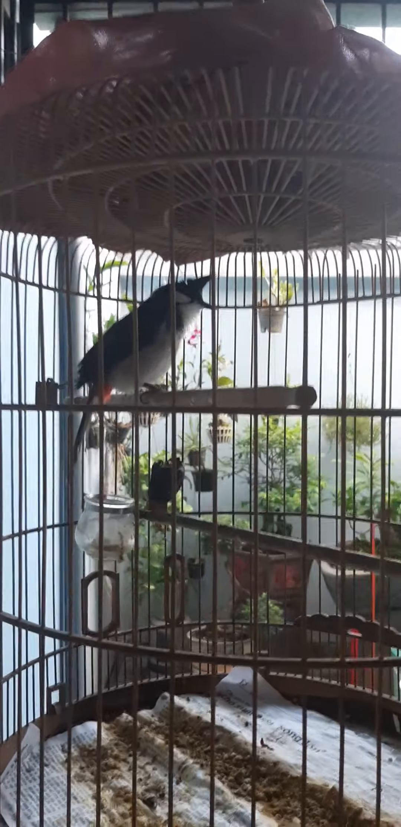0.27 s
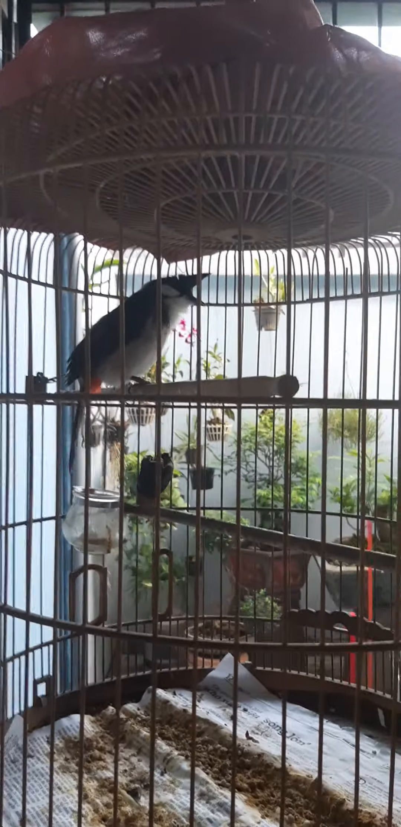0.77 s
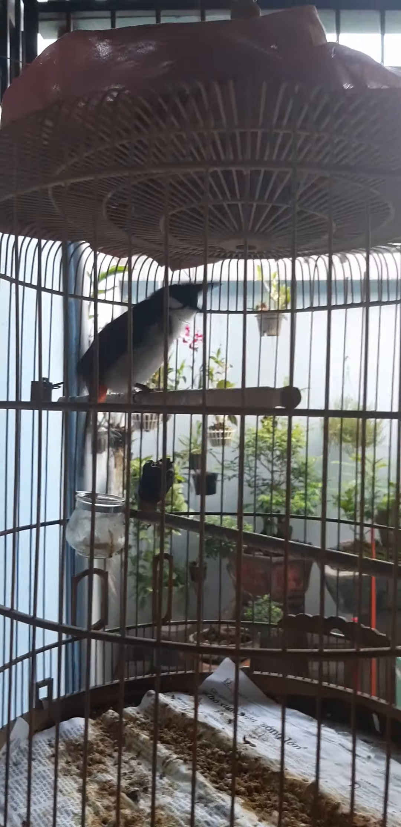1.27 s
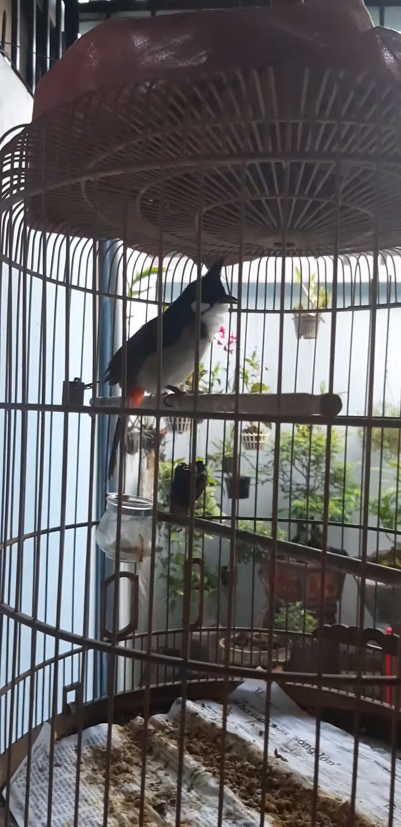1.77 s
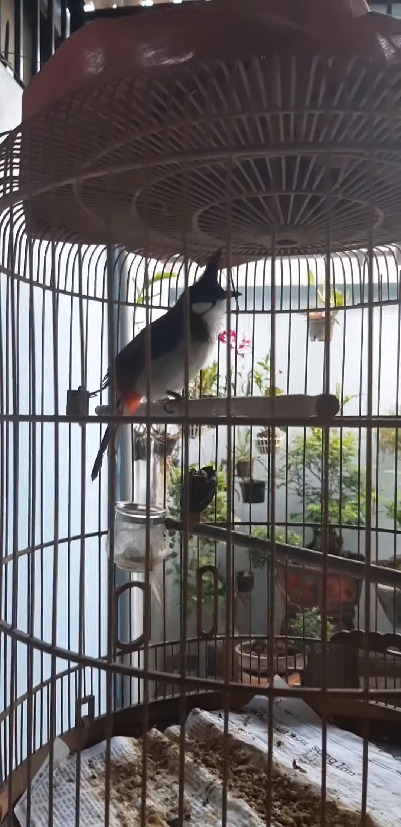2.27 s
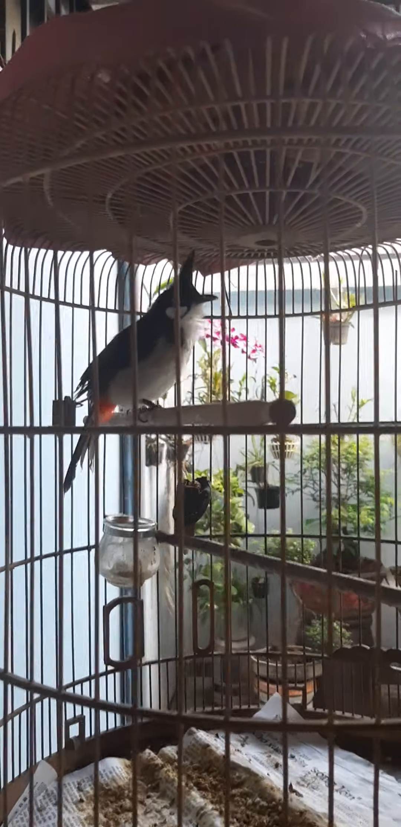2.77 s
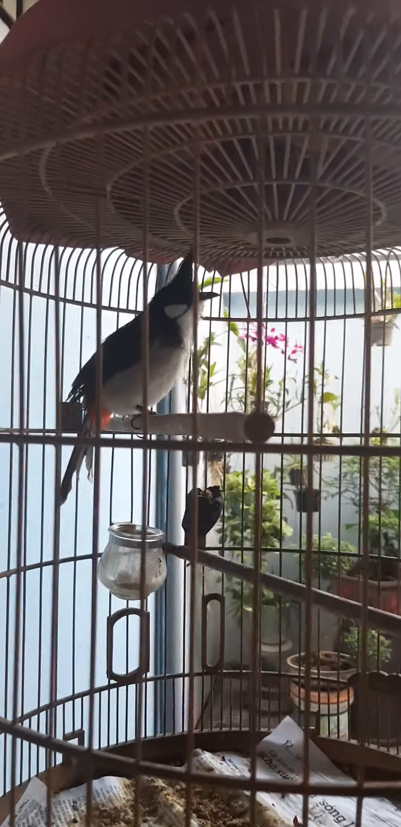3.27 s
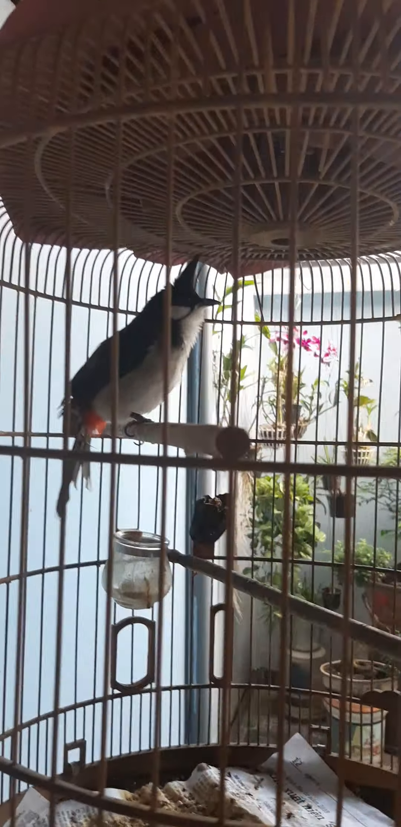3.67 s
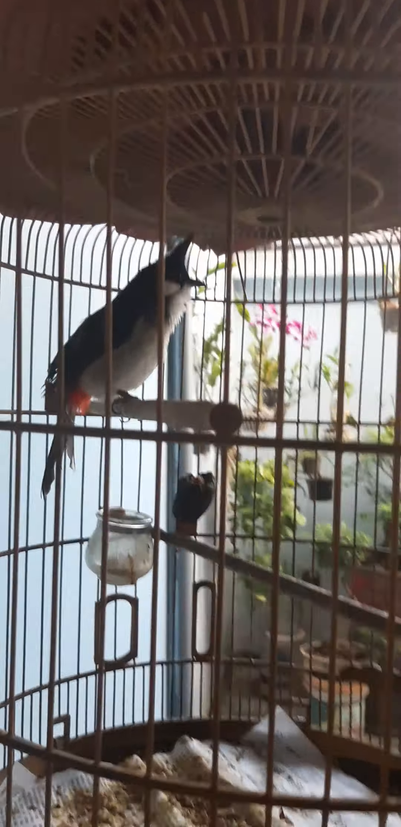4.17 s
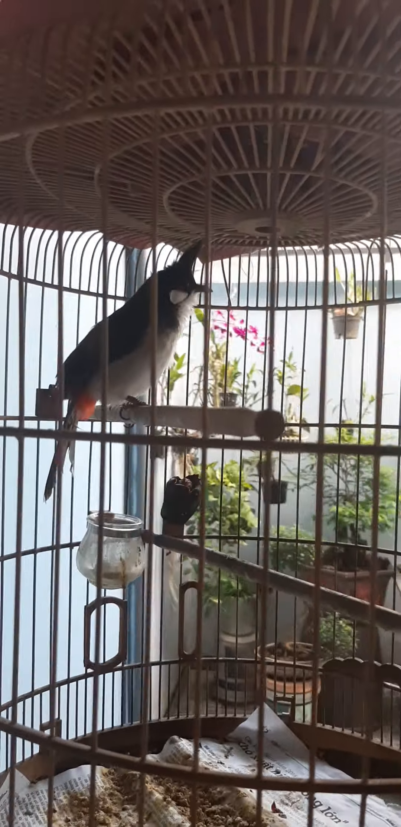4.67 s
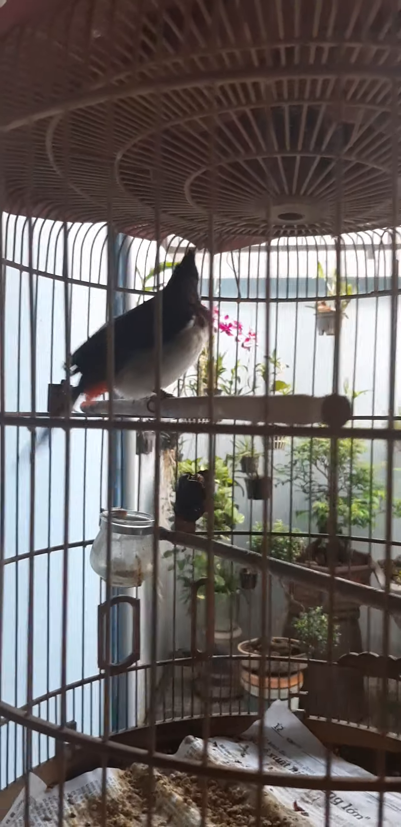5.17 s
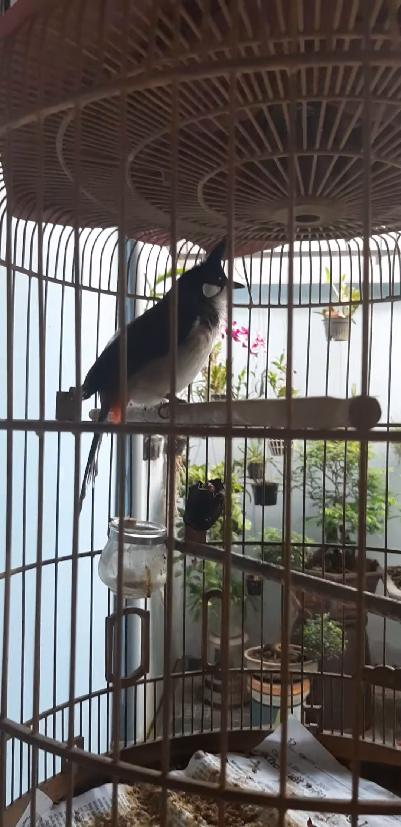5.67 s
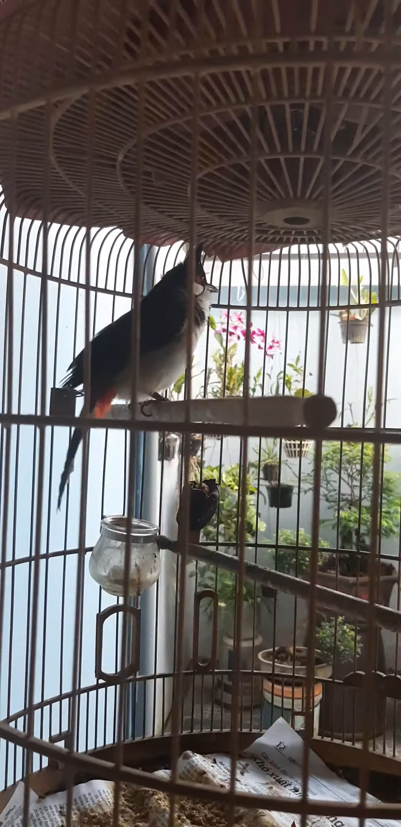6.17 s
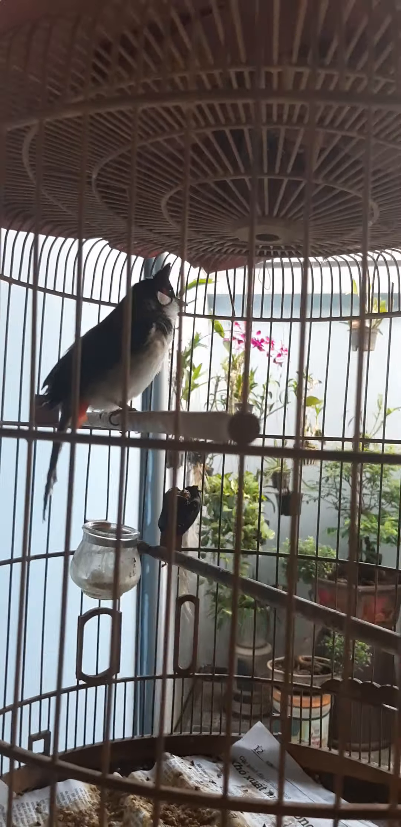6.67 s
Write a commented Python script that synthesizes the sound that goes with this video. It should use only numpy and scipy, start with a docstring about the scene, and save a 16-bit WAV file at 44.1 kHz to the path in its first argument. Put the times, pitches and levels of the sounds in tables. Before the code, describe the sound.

A caged bulbul close by gives low chips and loud slurred whistles, then a fast warbled phrase, ringing in a walled courtyard over faint traffic.

```python
"""A small walled courtyard, where a red-whiskered bulbul sings in a cage close by.
The bird is a nearly pure gliding tone, shaped by its throat, with some rattle and breathy rasp.
It gives arched chips and slurred whistles, then a loud warbled phrase; the walls ring after each note.
Shaped noise makes a rumbling street, a background hiss, soft hoarse swells and a ruffle of feathers;
sine waves make a motor hum, a low drone, a far horn and a thin squeal."""
import sys
import numpy as np
from scipy import signal
from scipy.fft import rfft, irfft, next_fast_len
from scipy.io import wavfile
from scipy.ndimage import uniform_filter1d, map_coordinates

SR = 44100
rng = np.random.default_rng(int(sys.argv[2]) if len(sys.argv) > 2 else 0)


def to_wav(sig):
    """Store sig (one row per channel, or 1-D mono) as 16-bit WAV at the path in sys.argv[1].

    Samples outside -1..1 are clipped; the rate is SR.
    """
    pcm = np.clip(np.atleast_2d(sig), -1, 1) * 32767
    pcm = np.round(pcm).astype(np.int16)
    wavfile.write(sys.argv[1], SR, pcm.T)  # frames by channels


N = 305613  # length in samples


def amp(db):
    """Turn decibels into a gain."""
    return 10 ** (np.asarray(db) / 20)


def unit(x):
    """Scale x to an rms of 1."""
    return x / np.sqrt(np.mean(x ** 2) + 1e-20)


def along(points, hz):
    """Read (Hz, value) points at the given frequencies, on a log axis."""
    f, v = np.transpose(points)
    return np.interp(np.log(hz + 1), np.log(f + 1), v)


def curve(rows):
    """Join (seconds, value) rows by straight lines, one value per sample."""
    return np.interp(np.arange(N) / SR, *np.transpose(rows))


def wobble(rate):
    """A smooth random curve with this many random points a second."""
    knots = rng.standard_normal(int(N * rate / SR) + 4)
    return map_coordinates(knots, [np.arange(N) * rate / SR])


def filtered(x, response):
    """Multiply the spectrum of x by a response, which may be complex."""
    m = next_fast_len(N + SR // 2)
    return irfft(rfft(x, m) * response(np.fft.rfftfreq(m, 1 / SR)), m)[..., :N]


def noise(spectrum):
    """Two unrelated coloured noises, with an rms of 1."""
    return unit(filtered(rng.standard_normal((2, N)), lambda hz: amp(along(spectrum, hz))))


def gate(t, start, end, edge):
    """1 between start and end, with soft edges."""
    ramp = np.clip(np.minimum(t - start, end - t) / edge + .5, 0, 1)
    return np.sin(np.pi / 2 * ramp) ** 2


def swells(rows, edge):
    """Loudness curve of (start, length, dB) rows."""
    t = np.arange(N) / SR
    return sum(amp(db) * gate(t, s, s + length, edge) for s, length, db in rows)


def phase_of(hz):
    """Running phase of a pitch curve."""
    return 2 * np.pi * np.cumsum(hz) / SR


# Tone colour of the street. Each row: frequency in Hz, relative level in dB per Hz.
STREET_COLOUR = [(25, -31), (45, -16), (70, -11), (88, -5.5), (110, 4), (160, -2.5), (315, -2), (500, -9.5),
                 (800, -13), (1700, -15), (2600, -21), (3400, -33.5), (5000, -48)]
# How alike the street is at left and right. Each row: frequency in Hz, likeness from -1 to 1.
STREET_LIKENESS = [(60, 0.99), (180, 0.95), (550, 0.7), (1650, -0.3), (5000, -0.4)]
TRAFFIC_DB, TRAFFIC_DRIFT_DB = -51.5, -1.5  # middle level of the rumble, size of its slow drift


def traffic_rumble(flutter_db=1):
    """Many blended traffic sounds act like coloured noise, alike in both ears in the bass."""
    turn = lambda hz: np.arccos(np.clip(along(STREET_LIKENESS, hz), -1, 1)) / 2
    shares = lambda hz: np.array([np.cos(turn(hz)), np.sin(turn(hz))])
    mid, side = filtered(noise(STREET_COLOUR), shares)
    level_db = TRAFFIC_DB + TRAFFIC_DRIFT_DB * wobble(1) + flutter_db * wobble(14)
    return unit(np.array([mid + side, mid - side])) * amp(level_db)


# Steady tones of the motor. Each row: middle pitch in Hz, middle rms level in dB.
HUM_TONES = [(48.5, -72.5), (97.5, -56), (436, -64), (552, -71.5)]


def motor_hum(waver_db=0.84, waver_hz=1.57):
    """A running motor hums as a few sine tones, wavering a little in pitch and level."""
    hum = 0
    for hz, db in HUM_TONES:
        level = np.sqrt(2) * amp(db + waver_db * wobble(13))
        hum = hum + level * np.sin(phase_of(hz + waver_hz * wobble(6.8)))
    return hum


# loudest moment in seconds, middle level there in dB, seconds from there to fade to half
DRONE_S, DRONE_DB, DRONE_HALF_S = 3.72, -53.5, 0.23


def low_drone(drone_hz=140):
    """A low, unsteady drone swells briefly and fades."""
    t = np.arange(N) / SR
    swell = 1 / (1 + ((t - DRONE_S) / DRONE_HALF_S) ** 2)
    tone = np.sin(phase_of(drone_hz * (1 + 0.021 * wobble(25))))
    return swell * amp(DRONE_DB + 3 * wobble(23)) * tone


# Tone colour of the background hiss. Each row: frequency in Hz, relative level in dB per Hz.
HISS_COLOUR = [(1500, -13.5), (3300, 4.5), (5000, 0), (6500, -4.5), (7700, -0.5), (10000, -7),
               (13000, -2.5), (15700, -19)]
# Loudness of the hiss over time. Each row: time in seconds, rms level in dB.
HISS_LOUDNESS = [(0, -63.5), (.3, -58), (1.15, -61.5), (2.05, -60), (2.9, -61.5), (3.35, -65), (3.84, -59),
                 (4.2, -63), (4.7, -63.5), (4.86, -57.5), (5.1, -63), (5.7, -59.5), (6.5, -67)]


def background_hiss():
    """A faint background hiss of uneven loudness: coloured noise, unrelated at left and right."""
    return amp(curve(HISS_LOUDNESS)) * noise(HISS_COLOUR)


def fading(pulsing_db, fading_db=3):
    """Far tones pulse alike, and fade differently, at the two microphones."""
    return amp(fading_db * np.array([wobble(5.1), wobble(30)]) + pulsing_db * wobble(65))


# A far horn, faint and then full. Each row: start in seconds, length in seconds, level in dB.
HORN_BLASTS = [(4.62, 0.28, -71), (4.89, .33, -59)]
# Upper tones of the horn. Each row: multiple of the base pitch, relative level in dB.
HORN_TONES = [(6, -11), (7, 1), (8, -5), (9, -11)]


def far_horn(horn_hz=432.0, pulsing_db=6.0):
    """Only the upper partials of the horn are heard, each pulsing and fading on its own."""
    phase = phase_of(horn_hz * (1 + 0.000936 * wobble(30)))
    tone = sum(amp(db) * fading(pulsing_db) * np.sin(round(k) * phase) for k, db in HORN_TONES)
    return swells(HORN_BLASTS, edge=0.063) * tone


# A thin far squeal. Each row: start in seconds, length in seconds, level in dB before it pulses.
SQUEALS = [(0, 0.16, -58.5), (.42, 0.23, -52), (.68, .17, -61), (1.0, 0.3, -60), (1.58, 0.22, -64),
           (2.19, 0.18, -57), (3.34, 0.17, -70)]
SQUEAL_WAVER = .004  # pitch waver, as a share of the pitch


def far_squeal(squeal_hz=3925, pulsing_db=5):
    """A single high tone trembles in pitch and loudness."""
    tone = np.sin(phase_of(squeal_hz * (1 + SQUEAL_WAVER * wobble(200))))
    return swells(SQUEALS, edge=0.11) * fading(pulsing_db) * tone


# Soft, hoarse swells. Each row: start in seconds, length in seconds, level in dB before the grain.
HOARSE_SWELLS = [(2.5, 0.29, -48), (5.3, .33, -49.5)]
# Tone colour of the hoarse swells. Each row: frequency in Hz, relative level in dB per Hz.
HOARSE_TONE = [(200, -50), (600, -2), (850, -6), (1030, 4.5), (1400, -5.5), (1850, 1.5), (2600, -7),
               (3200, -3), (3600, -8.5), (4500, -10.5), (7000, -19), (15000, -38)]


def hoarse_noise(grain_db=2):
    """Coloured noise with a fine grain swells softly and fades."""
    return swells(HOARSE_SWELLS, edge=0.14) * amp(grain_db * wobble(90)) * noise(HOARSE_TONE)


# The bird ruffles its feathers. Each row: start in seconds, length in seconds, rms level in dB.
RUFFLES = [(4.765, 0.06, -52.5)]
# Tone colour of the plumage. Each row: frequency in Hz, relative level in dB per Hz.
FEATHER_COLOUR = [(200, -7), (300, 15), (700, -12), (2000, 9), (4200, 1), (7000, -6), (15000, -11)]


def feathers():
    """Rubbing plumage makes a brief, soft burst of coloured noise."""
    return swells(RUFFLES, edge=0.017) * noise(FEATHER_COLOUR)


# Short arched chips. Each row: start in seconds, top pitch in Hz, level in dB before the swell.
CHIP_NOTES = [(.008, 1361, -29), (.051, 1471, -33), (.427, 1285, -27.5), (.465, 1329, -28.5),
              (.512, 1302, -29.5), (.771, 1304, -27), (2.858, 1199, -26.5), (2.896, 1420, -28),
              (2.940, 1424, -25.5), (3.475, 1178, -28), (5.225, 1201, -30.5), (5.26, 1421, -30),
              (5.301, 1493, -27), (5.492, 1221, -27.5), (5.535, 1520, -24.5), (5.577, 1582, -26)]
# length in seconds of a chip at this pitch in Hz; higher chips last longer by this power
CHIP_S, CHIP_HZ, CHIP_STRETCH = .028, 1344, 1.8
# a chip ends by falling this many times its height above the resting pitch
REST_HZ, CHIP_FALL = 1069, 1.2


def chips(u, rise_octaves=0.28, crest=0.35, swell_db=6):
    """Tension rises and lets go: an arch of pitch, pushed harder and harder to the end."""
    for s, hz, db in CHIP_NOTES:
        length = CHIP_S * (hz / CHIP_HZ) ** CHIP_STRETCH
        fall = CHIP_FALL * np.log2(hz / REST_HZ)
        climbing = rise_octaves * (1 - u / crest) ** 2
        falling = fall * ((u - crest) / (1 - crest)) ** 2
        sag = np.where(u < crest, climbing, falling)  # octaves below the top pitch
        yield s + length * u, hz * 2 ** -sag, db + swell_db * (u - 1.5)


def slide(u, s, length, from_hz, to_hz, from_db, to_db):
    """Times, pitches and levels of an even slide, as u goes from 0 to 1."""
    return s + length * u, from_hz * (to_hz / from_hz) ** u, from_db + (to_db - from_db) * u


# The main call: a soft run-up, a leap to a loud crest, a glide down and a closing flick.
# Each row: time of the leap in seconds, lengths of run-up, crest and glide in seconds,
# crest pitch in Hz, pitch at the start of the glide in Hz, then levels in dB: start of the run-up,
# top of the crest, start of the glide, middle of the flick.
MAIN_CALLS = [(.840, 0.037, 0.046, 0.033, 1800, 1595, -36.5, -27, -31, -35),
              (1.351, .046, 0.033, .074, 2275, 1890, -38.5, -15, -25.5, -25),
              (1.709, .040, 0.028, .085, 2113, 1900, -49, -26.5, -27.5, -34),
              (3.529, 0.024, 0.02, 0.058, 2206, 2060, -39.5, -21, -21.5, -30),
              (3.961, .043, .029, .084, 2255, 1860, -51, -21, -26.5, -26),
              (4.368, 0.052, 0.019, 0.077, 2194, 1860, -50, -18, -27, -29.5)]
RUN_FROM_HZ, RUN_TO_HZ, RUN_TO_DB = 1080, 1629, -31  # the run-up climbs to where the voice breaks
# bend of the crest in octaves, share of it at which it is loudest, its swell in dB
CREST_ARCH_OCT, CREST_PEAK, CREST_SWELL_DB = .11, 0.9, 8
GLIDE_TO_HZ, GLIDE_FADE_DB = 1555, 11
FLICK_S, FLICK_TO_HZ = .016, 960


def calls(u):
    """Run-up, crest, glide and flick, joined into one unbroken note."""
    for (s, run_s, crest_s, glide_s, crest_hz, glide_hz,
         run_db, crest_db, glide_db, flick_db) in MAIN_CALLS:
        run = slide(u, s - run_s, run_s, RUN_FROM_HZ, RUN_TO_HZ, run_db, RUN_TO_DB)
        arch_hz = crest_hz * 2 ** (-CREST_ARCH_OCT * (2 * u - 1) ** 2)
        swell_db = crest_db - CREST_SWELL_DB * (u / CREST_PEAK - 1) ** 2
        crest = (s + crest_s * u, arch_hz, swell_db)
        end_db = glide_db - GLIDE_FADE_DB
        glide = slide(u, s + crest_s, glide_s, glide_hz, GLIDE_TO_HZ, glide_db, end_db)
        flick_start = s + crest_s + glide_s
        t, hz, db = slide(u, flick_start, FLICK_S, GLIDE_TO_HZ, FLICK_TO_HZ, end_db, end_db)
        flick = (t, hz, db + (flick_db - end_db) * np.sin(np.pi * u))
        yield np.hstack([run, crest, glide, flick])


# Plain whistles of the closing phrase. Each row: start in seconds, length in seconds,
# first and last pitch in Hz, first and last level in dB.
PLAIN_WHISTLES = [(5.874, .035, 2260, 1700, -18, -26), (6.069, .010, 1430, 1600, -43, -29),
                  (6.083, .019, 2294, 1823, -20, -26.5), (6.129, 0.065, 3207, 3105, -19, -23),
                  (6.271, 0.02992, 2608, 2670, -21, -14.5), (6.325, 0.028, 2618, 2630, -23, -22.5),
                  (6.502, .024, 2052, 1931, -20.5, -33.5), (6.537, .016, 1406, 1608, -37, -26.5),
                  (6.556, 0.053, 1850, 1523, -30, -29.5)]
# Fast warbles among them. Each row: start in seconds, length in seconds, first and last pitch in Hz,
# first and last level in dB, pitch swing to each side in octaves, swings a second.
FAST_WARBLES = [(5.848, .024, 2783, 2225, -22.5, -23.5, 0.15, 170),
                (6.103, .028, 2340, 2717, -21, -13, .22, 98),
                (6.367, .034, 2150, 2122, -24, -23.5, 0.19, 88),
                (6.41, 0.038, 2573, 3039, -22.5, -33.5, .33, 87),
                (6.472, 0.027, 2600, 2843, -26, -29, .22, 55)]


def closing_phrase(u):
    """Plain slides, and slides on which the pitch swings fast."""
    for row in PLAIN_WHISTLES:
        yield slide(u, *row)
    for *row, swing, rate in FAST_WARBLES:
        t, hz, db = slide(u, *row)
        yield t, hz * 2 ** (swing * np.sin(2 * np.pi * rate * (t - t[0]))), db


def gestures(edge=0.0055):
    """Pitch and loudness of the syrinx, the bird's voice organ, through all notes."""
    t = np.arange(N) / SR
    u = np.linspace(0, 1, 64)  # progress through a note or a part of one
    notes = sorted([*chips(u), *calls(u), *closing_phrase(u)], key=lambda note: note[0][0])
    times, pitches, _ = np.hstack(notes)
    pitch = np.interp(t, np.maximum.accumulate(times), pitches)
    loud = np.zeros(N)
    for s, _, db in notes:
        on = slice(max(int((s[0] - edge) * SR), 0), int((s[-1] + edge) * SR))
        loud[on] += amp(np.interp(t[on], s, db)) * gate(t[on], s[0], s[-1], edge)
    # round off the corners
    return uniform_filter1d(pitch, size=110), uniform_filter1d(loud, size=110)


# Throat and open beak, tuned near 2.3 kHz. Each row: frequency in Hz, gain in dB.
THROAT_GAIN = [(900, -38.5), (1200, -14.5), (1450, -5), (1750, -2), (2300, 4.5), (2750, 4), (3200, -7),
               (3700, -15), (4400, -18), (5500, -23), (8300, -24), (9700, -30), (11300, -10.5),
               (13200, -16.5), (15000, -39)]
# Tone colour of the air in the beak. Each row: frequency in Hz, relative level in dB per Hz.
RASP_COLOUR = [(2500, -0.5), (4500, 13), (6000, -3.5), (7800, 0.5), (9500, -13), (11200, -1), (13000, 6),
               (14200, -16), (15500, -36)]


def bulbul(jitter=0.00616, shimmer_db=3.5, overtone_db=-9, tilt_db=-4, rasp_db=-31, purity_db=-10,
           pure_hz=2200, rough=0.47, slack_hz=1750, count=11):
    """A nearly pure tone; the throat favours whichever harmonic passes its resonance."""
    pitch, loud = gestures()
    pitch = pitch * (1 + jitter * wobble(350))
    phase = phase_of(pitch)
    k = np.arange(1, count + 1)[:, None]  # harmonic numbers
    # the taut membranes of high notes swing more purely
    clean_db = purity_db * np.log2(np.maximum(pitch / pure_hz, 1))
    source_db = (k > 1) * (overtone_db + clean_db + tilt_db * np.log2(k / 2))
    weights = amp(along(THROAT_GAIN, k * pitch) + source_db) * (k * pitch < SR / 2)
    harmonics = (weights * np.sin(k * phase)).sum(0)
    tone = np.sqrt(2) * harmonics / np.linalg.norm(weights, axis=0)
    # the slack membranes of low notes rattle, filling the throat's band between the harmonics
    slack = np.clip(2 * np.log2(slack_hz / pitch), 0, 1)
    rough_tone = filtered(tone * wobble(1800), lambda hz: amp(along(THROAT_GAIN, hz)))
    rattle = rough * slack * unit(rough_tone)
    # air hisses through once a cycle
    rasp = amp(rasp_db + clean_db) * noise(RASP_COLOUR)[0] * (1 + np.sin(phase))
    return loud * amp(shimmer_db * wobble(280)) * (tone + rattle + rasp)


# How long the yard rings. Each row: frequency in Hz, time in seconds to die away by 60 dB.
YARD_RINGING = [(500, 0.27), (2200, 0.55), (5000, 0.21), (13000, 0.54)]
# Phase by which the left microphone leads the right. Each row: frequency in Hz, lead in radians.
LEFT_LEAD = [(0, -7), (860, 0), (1750, 4.5), (2350, 6.5), (2650, 8), (4050, 12), (15300, 52)]


def courtyard(x, cage_db=-13, near_db=-9, near_t60=0.079, tail_db=-3.5, wall_s=.08, wall_db=-17):
    """Direct sound, dense answers from cage and nearby walls, a far wall's echo and the yard's tail."""
    hz, t, z = signal.stft(rng.standard_normal((2, SR * 3 // 4)), SR, nperseg=256)
    decay = amp(-60 * t / along(YARD_RINGING, hz)[:, None])
    tail = signal.istft(z * decay, SR, nperseg=256)[1]
    t = np.arange(tail.shape[1]) / SR
    tail = tail * np.clip(t / 0.0024, 0, 1)
    # two answers from the nearby walls, one from the cage
    near = rng.standard_normal((3, len(t))) * amp(-60 * t / near_t60) * (t > .003)
    near = near / np.linalg.norm(near[0])
    answer = amp(tail_db) * tail / np.linalg.norm(tail[0]) + amp(near_db) * near[:2]
    wet = signal.fftconvolve(x[None], answer, axes=1)[:, :N]
    # the cage's answer and the far wall's echo come from the bird's own direction
    front = x + amp(cage_db) * signal.fftconvolve(x, near[2])[:N]
    echo = lambda f: 1 + amp(wall_db) * np.exp(-2j * np.pi * f * wall_s)
    halves = np.array([[.5], [-.5]])  # left ahead, right behind
    ports = lambda f: np.exp(1j * halves * np.interp(f, *np.transpose(LEFT_LEAD)))
    return wet + filtered(front, lambda f: echo(f) * ports(f))


def scene():
    """The bird in its courtyard over the background sounds."""
    background = traffic_rumble() + motor_hum() + low_drone() + background_hiss()
    background = background + far_horn() + far_squeal() + hoarse_noise()
    bird = courtyard(bulbul()) * amp([[-.4], [.4]])  # slightly louder at right
    return background + feathers() + bird


TOP_HZ = 15780  # band limit


def record(dry):
    """Keep nothing above the band limit."""
    return filtered(dry, lambda hz: hz < TOP_HZ)


dry = scene()
out = record(dry)
to_wav(out)
```